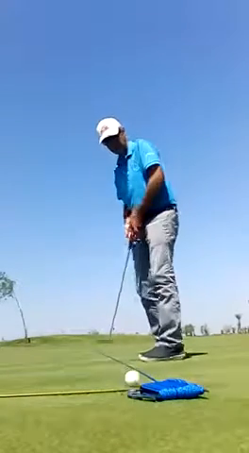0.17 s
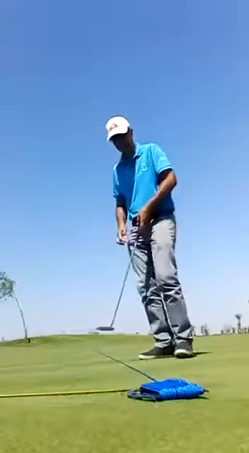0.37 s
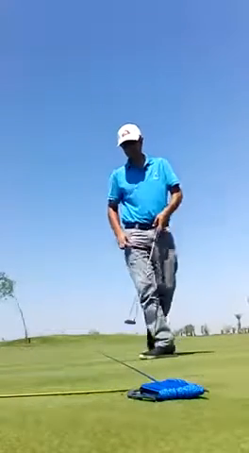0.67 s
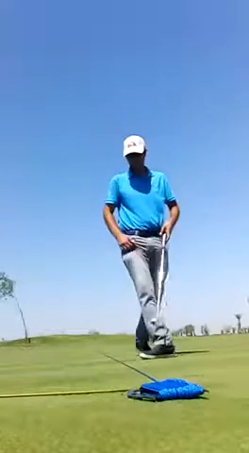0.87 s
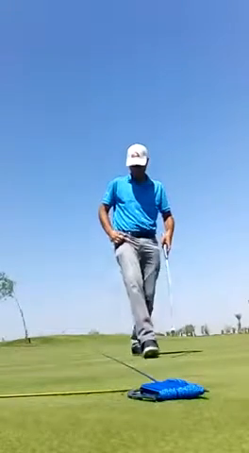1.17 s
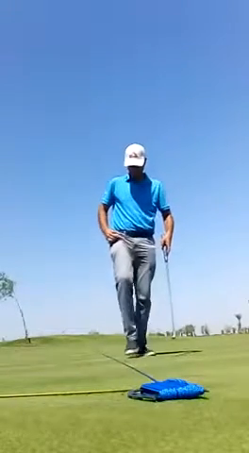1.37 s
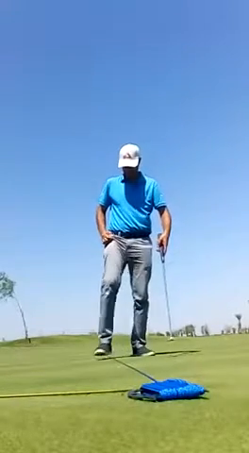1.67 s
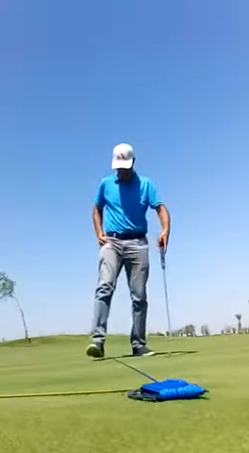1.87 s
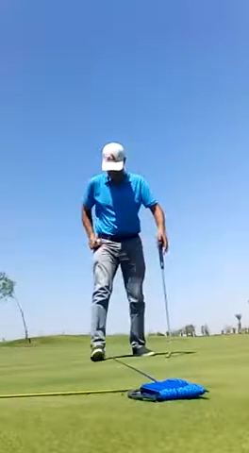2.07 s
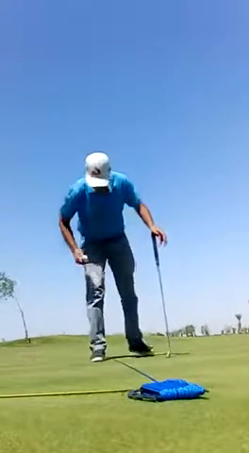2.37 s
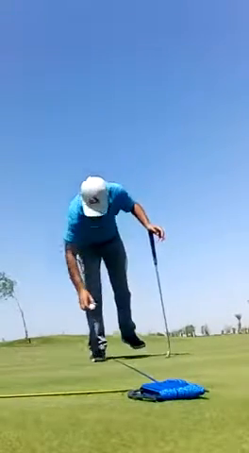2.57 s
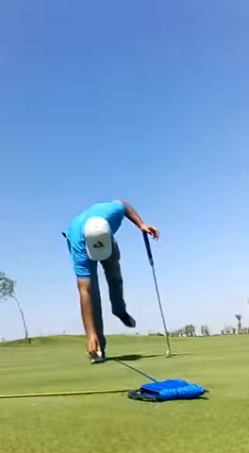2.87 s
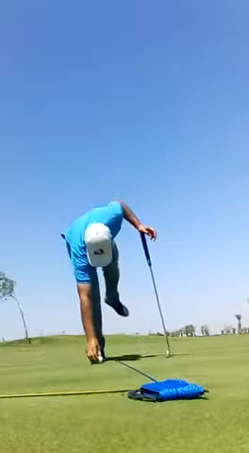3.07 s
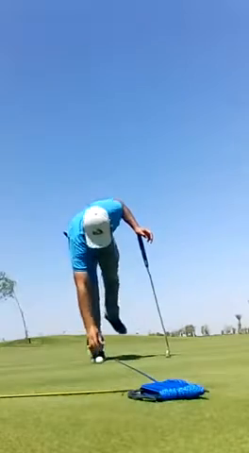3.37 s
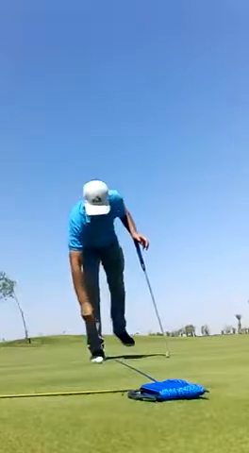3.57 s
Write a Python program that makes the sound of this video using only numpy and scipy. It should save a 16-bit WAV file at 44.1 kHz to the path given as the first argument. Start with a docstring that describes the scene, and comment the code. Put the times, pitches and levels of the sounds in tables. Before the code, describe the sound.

A golf ball drops into a plastic cup, heard close up: soft low bumps at about 0.35 to 0.46 seconds, a bright clack at 0.45, then quick, weakening knocks and rattles until 0.8. Low wind rumble, a faint far hum, hiss and a barely audible thin whine run throughout. Small birds twitter mostly on the left, busier around 1.0-1.4, 2.5-2.8 and after 3.1. One dull turf click falls near 2.2.

```python
"""Low wind rumble, a faint far hum, hiss and a thin whine run throughout, with small birds twittering,
mostly on the left; early on a golf ball bumps over the edge of a hole on an open green, drops and rattles
to rest in the plastic cup. Later there is one dull click on the turf. Wind and hiss are shaped noise, the hum
is noise through narrow resonances, birds are gliding sines with noisy echoes, the bumps are short low tones,
and each contact in the cup is a short knock plus a click and fast-dying tones."""
import sys
import numpy as np
from scipy import signal
from scipy.fft import rfft, irfft
from scipy.io import wavfile

SR = 44100
rng = np.random.default_rng(int(sys.argv[2]) if len(sys.argv) > 2 else 0)


def dump_mix(stems):
    """Bounce the given channels to the path in sys.argv[1] as a 16-bit WAV at rate SR."""
    frames = np.atleast_2d(stems).T  # one column per channel
    limited = np.clip(frames, -1, 1)  # hard clip at full scale
    pcm = np.round(limited * 32767).astype(np.int16)
    wavfile.write(sys.argv[1], SR, pcm)


N = 163611   # length in samples

# Wind rumble over time: t/s, level/dB
WIND_LEVEL = [(0, -40.5), (.15, -44), (.45, -39.5), (.8, -41), (1.2, -44), (1.6, -43.5), (1.9, -45),
              (2.2, -44), (2.5, -42.5), (2.8, -43), (3.0, -42), (3.3, -44.5), (3.71, -44.5)]
# Tone colour of the rumble: f/Hz, relative level/dB
RUMBLE_COLOUR = [(30, -46), (45, -40), (62, -0.5), (102, -1), (140, -3), (300, -16.5), (560, -25),
                 (1500, -49)]
# Far hum: f/Hz, width/Hz, level/dB
FAR_HUM = [(132, 5.8, -48.5), (328.4, 5.5, -63)]
# Hiss shared by both ports: f/Hz, relative level/dB
HISS_SHARED = [(700, 7.5), (1600, 4.5), (3000, 5), (5500, 1), (7000, -5), (8800, -6), (11500, 3),
               (15500, 1.5)]
# Hiss with opposite sign in the two ports: f/Hz, relative level/dB
HISS_OPPOSITE = [(400, 3), (1000, -11), (3000, -7), (5500, -1), (7500, -6.5), (11500, 1), (15500, 1.5)]
# Near bird notes: t/s, length/s, start f/Hz, middle f/Hz, end f/Hz, level before wavering/dB
BIRD_NOTES = [(.125, 0.054, 5000, 3980, 3680, -63.5), (.28, 0.023, 4400, 4750, 5330, -57.5),
              (.682, 0.015, 4570, 4670, 5300, -50), (.702, 0.014, 5730, 4900, 4030, -52),
              (.753, 0.015, 4470, 4410, 4260, -53.5), (.915, 0.068, 4900, 4470, 3700, -59.5),
              (1.036, 0.023, 3850, 5180, 6150, -52), (1.052, 0.033, 4810, 4070, 3760, -48.5),
              (1.062, 0.032, 4200, 4380, 4300, -53), (1.11, 0.043, 3990, 3810, 3860, -55.5),
              (1.155, 0.019, 3780, 3630, 3740, -60), (1.21, .05, 5150, 4750, 4800, -52),
              (1.252, .028, 5900, 5350, 3900, -50), (1.27, .02, 5700, 5300, 4700, -56),
              (1.29, .03, 3800, 4950, 3900, -47.5), (1.326, .018, 3800, 4200, 4900, -47),
              (1.342, .035, 4100, 4700, 5000, -50), (1.372, 0.052, 4850, 4740, 4720, -56),
              (1.685, 0.043, 4970, 4800, 4300, -58.5), (1.975, 0.015, 3950, 4120, 4300, -60.5),
              (2.325, 0.02, 4080, 4180, 4300, -59.5), (2.37, 0.035, 5100, 5150, 4650, -59),
              (2.498, .032, 4500, 4750, 5150, -50), (2.527, .03, 4600, 3750, 3750, -59),
              (2.558, .012, 5600, 5900, 6100, -59), (2.582, 0.0074, 4960, 4750, 4480, -45),
              (2.622, 0.039, 5240, 5150, 4250, -57), (2.69, 0.06, 5470, 4870, 4900, -58),
              (2.713, .018, 3800, 4150, 4350, -54), (2.765, .036, 3900, 4350, 5100, -54),
              (2.78, .045, 3950, 4400, 4700, -55), (3.136, .022, 4300, 4900, 5700, -56),
              (3.15, .018, 5500, 4900, 4300, -54), (3.158, .016, 5600, 4900, 4200, -53),
              (3.165, .03, 4200, 3950, 4200, -50), (3.175, 0.047, 5050, 5000, 4900, -58),
              (3.2, .04, 3840, 3830, 3760, -58), (3.235, .045, 3560, 3490, 3620, -55),
              (3.28, 0.018, 4500, 4430, 4750, -62), (3.521, .016, 4000, 5800, 6050, -55),
              (3.534, .016, 4300, 5900, 6000, -53), (3.55, .027, 5900, 5000, 4050, -48),
              (3.558, .016, 5600, 5700, 5200, -49), (3.576, .012, 5000, 4800, 4800, -55),
              (3.605, .013, 5900, 5400, 4000, -51), (3.617, 0.021, 5840, 5680, 5470, -64),
              (3.631, 0.03, 3860, 4600, 5080, -48), (3.654, 0.0073, 4830, 5070, 5050, -55),
              (3.673, 0.039, 4070, 4920, 4970, -43.5)]
# Low bumps as the ball crosses the edge: t/s, length/s, f/Hz, main tone level/dB, lateness of peak (0-1)
EDGE_BUMPS = [(0.349, 0.035, 115, -23.5, 0.17), (0.389, 0.023, 190, -21, 0.8),
              (0.4598, 0.0114, 117, -23.5, 0.04)]
# Ball in the cup: t/s, knock on the bottom level/dB, knock f/Hz, wall ring level/dB,
# wall brightness/(dB per octave), wall detuning/%
CUP_BOUNCES = [(.4503, -32, 1200, -20.5, -4, 0.5), (.5048, -23.5, 1110, -38, -10, 2),
               (.5158, -27.5, 1700, -24, 8, 3), (.528, -29, 980, -46, 5, -6),
               (.6, -46, 1200, -32.5, -7.5, -1), (.6364, -26, 1050, -49, -4, 8),
               (.6858, -32.5, 1530, -38, 12, -2), (.7046, -30, 960, -42, -4, 2),
               (.738, -47, 1300, -43, 4, -2.5), (.758, -36.5, 870, -50, 0, -6)]
# A lone dull click on the turf: columns as for the ball in the cup
TURF_CLICKS = [(2.1639, -36, 1500, -60, -8, 0)]
# Tones of the cup wall: f/Hz, level relative to the contact/dB, decay setting/s (see swell)
WALL_TONES = [(2187, -13, 0.0087), (3280, -7, 0.01), (3760, -14.5, 0.0033), (4230, -10, 0.0026),
              (4800, -10.5, 0.0072), (6500, -44, .003)]
# Air in the cup, under the knock: f/Hz, level relative to the knock/dB, decay setting/s (see swell)
CUP_AIR = (398, -4.5, 0.01)

RUMBLE_WIDTH_DB = -17.5   # opposite-sign rumble relative to the shared part
HISS_SHARED_DB, HISS_OPPOSITE_DB = -57, -52.5
WHINE_HZ, WHINE_DB = 12897, -78
CHORUS_DB, CHORUS_HZ = -72, 4390   # typical far bird note
CHORUS_SPREAD, CHORUS_S = 0.14, 0.0161   # pitch spread (natural log), average length in s
WARBLE_DB, WARBLE_HZ = 3.5, 200   # spread and rate of the birds' wavering
ECHO_T60_S, ECHO_DB, SHIMMER_HZ = .17, -4, 80
ECHO_APART = 1   # strength of the echoes that differ between the ports
PORT_CORNER_HZ = 3240   # around and above it the two ports hear a source from one side differently
BUMP_OVERTONE = 0.22
STRIKE_SPREAD_DB = 1.5   # random spread per wall tone and touch
TICK_DB = -3   # click of the touch itself, before its filter
KNOCK_CYCLES = 3.3   # decay setting of the knock, in cycles of its own pitch
CHATTER_S, CHATTER_DB = 0.00168, -4.5   # delay and relative level of the second touch
OFFSET = 0.0022   # constant shift of the waveform
CUTOFF_HZ = 16100   # 70 dB down from here upward


def undb(db):
    """Turn decibels into a gain."""
    return 10 ** (np.asarray(db) / 20)


def rms_one(x):
    """Scale to rms 1."""
    return x / np.sqrt(np.mean(x ** 2) + 1e-20)


def drift(rate):
    """Random wander of rms about 1: noise smoothed twice above `rate` Hz, made at every 40th sample."""
    r = np.exp(-80 * np.pi * rate / SR)
    noise = rng.standard_normal(N // 40 + 2002)
    slow = signal.lfilter([1], [1, -2 * r, r * r], noise)[2000:]   # drop the filter's start-up
    return np.interp(np.arange(N) / 40, np.arange(len(slow)), rms_one(slow))


def ring(clicks, hz, t60):
    """Resonance: a unit click sets off a sine that falls 60 dB in t60 seconds."""
    r, w = undb(-60 / (t60 * SR)), 2 * np.pi * hz / SR
    return signal.lfilter([0, np.sin(w)], [1, -2 * r * np.cos(w), r * r], clicks + 1e-18)


def coloured(points):
    """Noise of rms 1 with the given spectrum, falling away below its first point and flat above its last."""
    hz, db = np.transpose(points)
    log_f = np.log(np.arange(N // 2 + 1) * SR / N + 1)
    shape = np.interp(log_f, np.log(hz), db)
    shape -= 30 * np.maximum(np.log(hz[0]) - log_f, 0)
    return rms_one(irfft(rfft(rng.standard_normal(N)) * undb(shape), N))


def ports(x, pan_db, lag_s):
    """A source on the left: the left port gets stronger treble; the right gets weaker treble and all of it later."""
    f = np.arange(N // 2 + 1) * SR / N
    tilt = undb(pan_db / 2 * f ** 2 / (f ** 2 + PORT_CORNER_HZ ** 2))
    spectrum = rfft(x)
    left = irfft(spectrum * tilt, N)
    right = irfft(spectrum / tilt * np.exp(-2j * np.pi * f * lag_s), N)
    return np.array([left, right])


def swell(t, hz, db, decay_s):
    """A tone that swells for a moment, then dies: time times an exponential that falls 60 dB in decay_s."""
    u = t * np.log(1000) / decay_s
    return undb(db) * np.e * u * np.exp(-u) * np.sin(2 * np.pi * hz * t)


def wind():
    """Lumpy low rumble: shaped noise of wandering level, nearly the same in both ports."""
    s, db = np.transpose(WIND_LEVEL)
    level = undb(np.interp(np.arange(N) / SR, s, db) + 0.5 * drift(31))
    shared = level * coloured(RUMBLE_COLOUR)
    opposite = level * undb(RUMBLE_WIDTH_DB) * coloured(RUMBLE_COLOUR)
    return shared + opposite * [[1], [-1]]


def hum():
    """Far hum: noise through narrow resonances gives wavering tones, the same in both ports."""
    out = np.zeros(N)
    for hz, width_hz, db in FAR_HUM:
        t60 = np.log(1000) / np.pi / width_hz   # a narrower tone rings longer
        out += undb(db) * rms_one(ring(rng.standard_normal(N), hz, t60))
    return out


def hiss():
    """Microphone hiss: shaped noise, its opposite-sign part stronger than the shared part, and a thin whine."""
    whine = undb(WHINE_DB) * np.sin(2 * np.pi * WHINE_HZ * np.arange(N) / SR)
    shared = undb(HISS_SHARED_DB) * coloured(HISS_SHARED)
    opposite = undb(HISS_OPPOSITE_DB) * coloured(HISS_OPPOSITE)
    return shared + whine + opposite * [[1], [-1]]


def chorus():
    """Notes of far birds: short glides at random times and pitches, about 400 a second."""
    count = int(400 * N / SR)
    u, g = rng.random((count, 2)), rng.standard_normal((count, 4))
    start = u[:, 0] * N / SR
    length = CHORUS_S * (.5 + u[:, 1])
    # one pitch shift per note, plus a smaller one for its start, middle and end
    hz = CHORUS_HZ * np.exp(CHORUS_SPREAD * (g[:, :1] + .5 * g[:, 1:]))
    level = CHORUS_DB + g[:, 3]   # shares its draw with the end pitch
    return np.column_stack([start, length, hz, level])


def birds(notes, pan_db, lag_s):
    """Whistled glides on a parabola through three pitches, wavering in level, with shimmering leafy echoes."""
    out = np.zeros(N + SR)
    for s, length, a_hz, b_hz, c_hz, db in notes:
        u = np.arange(int(length * SR)) / (length * SR)
        hz = 2 * a_hz * (u - .5) * (u - 1) - 4 * b_hz * u * (u - 1) + 2 * c_hz * u * (u - .5)
        whistle = np.sqrt(np.sin(np.pi * u)) * np.sin(2 * np.pi * np.cumsum(hz) / SR)
        i = int(s * SR)
        out[i:i + len(u)] += undb(db) * np.sqrt(2) * whistle   # dB is the rms at the note's middle
    out = out[:N] * undb(WARBLE_DB * drift(WARBLE_HZ))
    t = np.arange(SR // 4) / SR
    echoes = rng.standard_normal((3, len(t))) * undb(-60 * t / ECHO_T60_S)
    blurs = []
    for echo in echoes:
        blur = signal.fftconvolve(out, echo / np.linalg.norm(echo))[:N]
        blurs.append(drift(SHIMMER_HZ) * blur)
    shared, left, right = blurs
    apart = ECHO_APART * np.array([left, right]) * undb([[pan_db / 4], [-pan_db / 4]])
    return ports(out + undb(ECHO_DB) * shared, pan_db, lag_s) + undb(ECHO_DB) * apart


def bumps():
    """The ball on the edge: a few soft low cycles each, their crests pointed by an overtone."""
    out, t = np.zeros(N), np.arange(N) / SR
    for s, length, hz, db, late in EDGE_BUMPS:
        u = np.clip((t - s) / length, 0, 1)
        phase = 2 * np.pi * hz * (t - s)
        envelope = np.sin(np.pi * u ** (.5 + 2 * late))
        out += undb(db) * envelope * (np.sin(phase) - BUMP_OVERTONE * np.cos(2 * phase))
    return out


def strikes(rows):
    """Each contact gives a short knock over the cup's air; the wall is touched twice, ticking and ringing."""
    out, tick, t = np.zeros(N), np.zeros(N), np.arange(SR // 25) / SR
    luck = rng.normal(0, 1, (len(rows), 2, len(WALL_TONES))) * STRIKE_SPREAD_DB
    air_hz, air_db, air_decay = CUP_AIR
    for (s, knock_db, knock_hz, ring_db, tilt_db, detune), luck_db in zip(rows, luck):
        i = int(s * SR)
        knock = swell(t, knock_hz, knock_db, KNOCK_CYCLES / knock_hz)
        air = swell(t, air_hz, knock_db + air_db, air_decay)
        out[i:i + len(t)] += knock - air
        touches = [(i, ring_db), (i + int(CHATTER_S * SR), ring_db + CHATTER_DB)]
        for (j, touch_db), own_db in zip(touches, luck_db):
            tick[j] = undb(touch_db + TICK_DB)
            for k, (hz, db, decay_s) in enumerate(WALL_TONES):
                bright_db = tilt_db * np.log2(hz / WALL_TONES[1][0])
                tone_db = touch_db + db + bright_db + own_db[k]
                tone = swell(t, hz * (1 + detune / 100), tone_db, decay_s)
                out[j:j + len(t)] -= (-1) ** k * tone   # neighbouring tones start in opposite directions
    band = signal.butter(2, [1200, 6500], "band", fs=SR, output="sos")
    return out + signal.sosfilt(band, tick)


def scene():
    """All sources added up at the two ports."""
    background = wind() + hum() + hiss()
    far = birds(chorus(), pan_db=16.0, lag_s=9e-5)
    near = birds(BIRD_NOTES, pan_db=12.0, lag_s=6e-5)
    ball = bumps() + ports(strikes(CUP_BOUNCES + TURF_CLICKS), pan_db=8.0, lag_s=3.5e-5)
    return background + far + near + ball


def record(dry):
    """Add a small constant offset and cut the top of the treble with a steep filter."""
    return signal.sosfilt(signal.cheby2(14, 70, CUTOFF_HZ, fs=SR, output="sos"), dry + OFFSET)


dry = scene()
out = record(dry)
dump_mix(out)
```